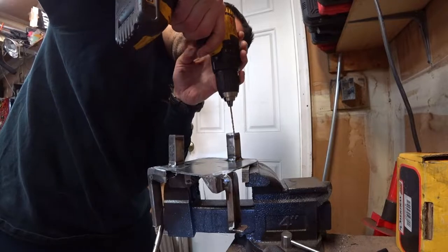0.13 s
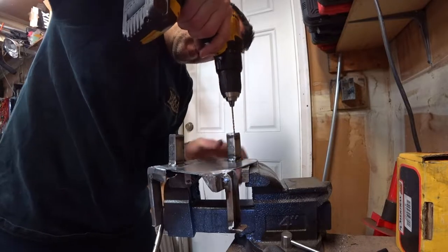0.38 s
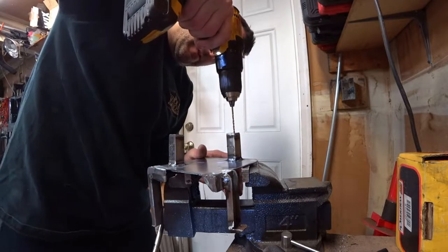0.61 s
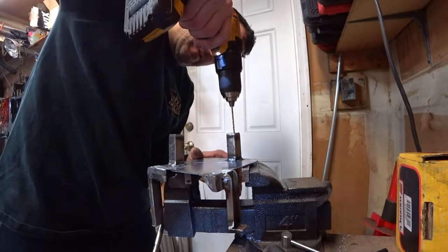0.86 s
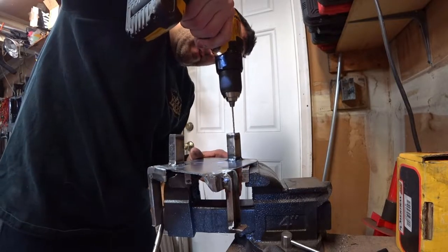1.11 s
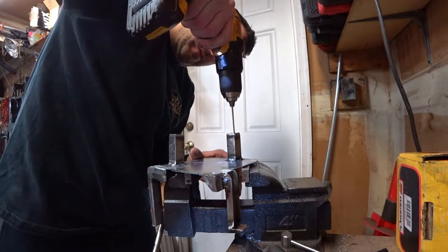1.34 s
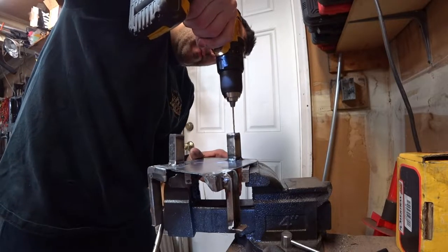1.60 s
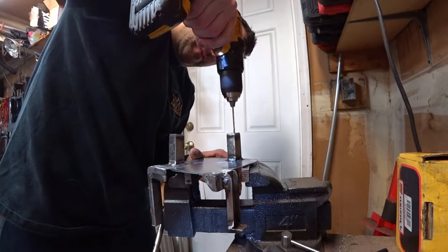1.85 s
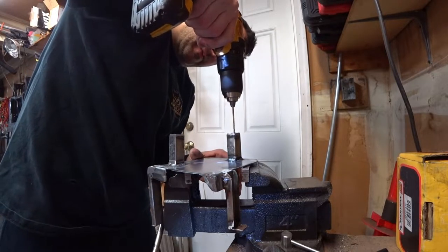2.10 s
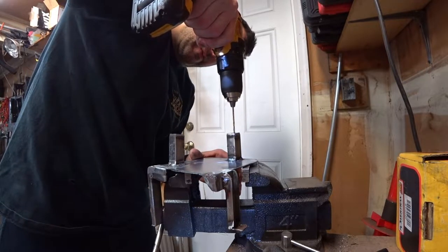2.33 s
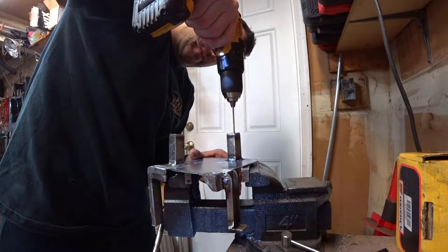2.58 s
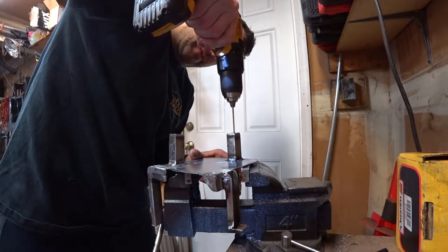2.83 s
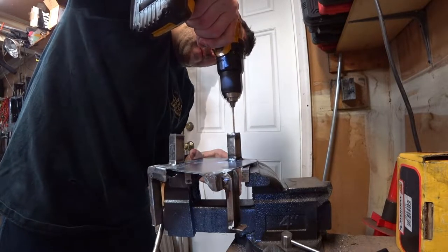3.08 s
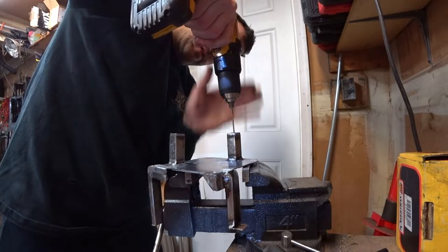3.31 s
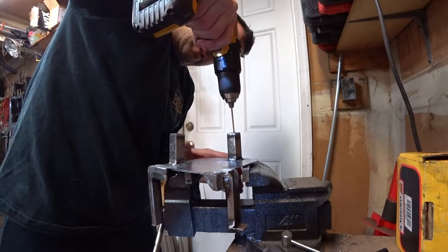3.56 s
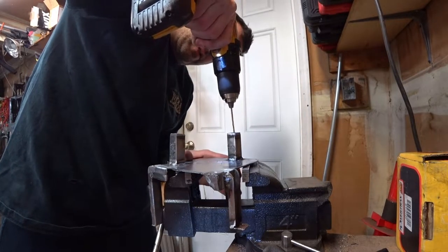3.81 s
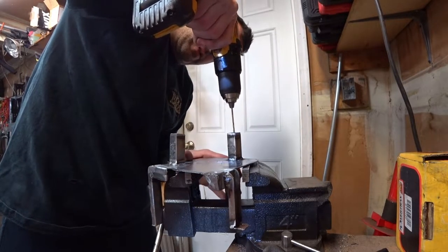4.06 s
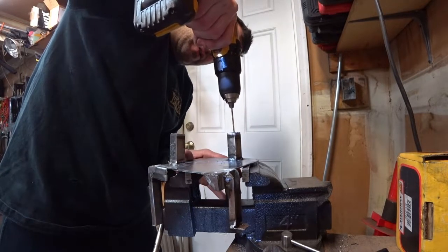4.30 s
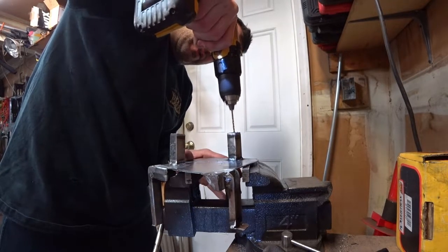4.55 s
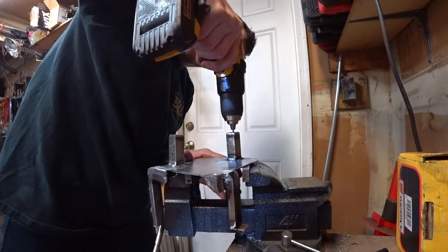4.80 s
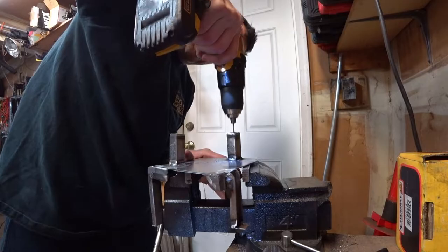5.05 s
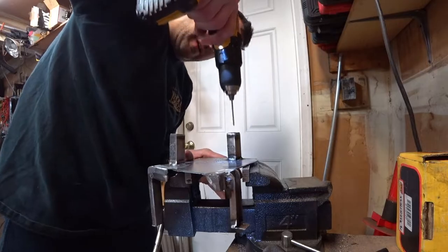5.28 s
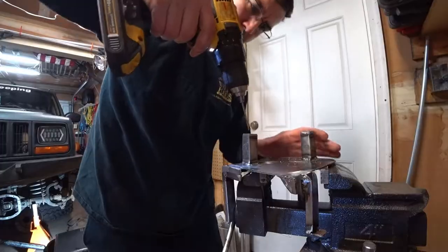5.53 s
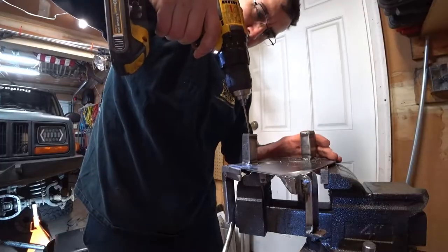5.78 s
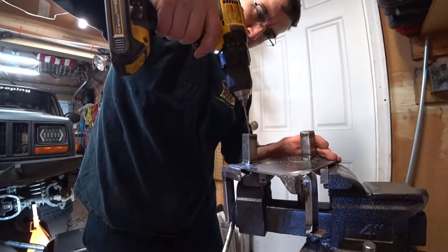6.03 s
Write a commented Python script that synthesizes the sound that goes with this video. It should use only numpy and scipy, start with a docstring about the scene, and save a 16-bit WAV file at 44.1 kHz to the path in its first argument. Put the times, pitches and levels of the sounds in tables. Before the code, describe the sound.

After faint finger clicks, a battery drill's gear whine climbs, holds high, sinks under load, catches roughly, and brakes into quiet room hum.

```python
"""A cordless drill bores aluminium in a garage vise, an arm's length from a small stereo microphone.
Room hum, coloured noise, lies under all; a finger click, a struck scrape ringing modes, comes before the motor.
Clatter (uneven impacts in the housing), a fixed trigger tone and speed-locked gear whines rise together;
the vise sings in patches as resonant noise, before, between and after snags of the bit as it breaks through.
The brake rattles the gears to rest, and a few small clicks end over the hum."""
import sys
import numpy as np
from scipy import signal
from scipy.fft import rfft, irfft
from scipy.io import wavfile
from scipy.ndimage import uniform_filter1d

SR = 44100
rng = np.random.default_rng(int(sys.argv[2]) if len(sys.argv) > 2 else 0)


def nominal_scale(level):
    """Amplitude ratio for a level in decibels (scalar or array-like)."""
    x = np.asarray(level, float) / 20
    return 10 ** x


def wav_record(signal):
    """Record a signal, one row per channel, as 16-bit PCM in the file named by sys.argv[1]."""
    frames = np.transpose(np.atleast_2d(signal))
    bounded = np.clip(frames, -1, 1)
    # unit amplitude maps onto the largest positive 16-bit level
    quanta = np.round(bounded * 32767).astype(np.int16)
    wavfile.write(sys.argv[1], SR, quanta)


N = 271215
TIME = np.arange(N) / SR
FREQ = np.fft.rfftfreq(N, 1 / SR)

# Spectrum of the garage's hum, before levelling: pitch_hz, level_db [per Hz]
ROOM_SPECTRUM = [(24, -76), (40, -45.5), (112, -33), (136, -3.5), (281, -10.5), (482, -3.5), (828, -9),
                 (1150, -3), (1230, -4), (1670, -6.5), (1930, -10), (3990, -18), (11000, -32), (14200, -64),
                 (22000, -120)]
# Tint of the sound coming back from the walls: pitch_hz, gain_db
WALL_TINT = [(60, 8.5), (140, -18.5), (300, -8.5), (800, 4), (2000, 4.5), (4500, -0.5), (9000, 2)]
# Fingers on chuck and trigger: start_s, peak_db, centre_hz, spread_octaves, scrape_ms
FINGER_CLICKS = [(.086, -43, 1200, 0.6, 7.5), (.653, -40.5, 3500, 0.9, 2.4), (.68, -41, 4500, 0.9, 4.4),
                 (5.796, -54, 5300, .4, 7.2), (5.802, -52, 600, .5, 8), (5.817, -47, 2400, 1.0, 7.9),
                 (5.826, -52, 750, .4, 9), (5.834, -53, 7200, .3, 10), (5.85, -52, 5400, .4, 9.3),
                 (6.002, -49, 4700, .4, 3), (6.007, -47, 8000, 1.0, 3)]
# The bit catches on the edge of the hole: start_s, peak_db, centre_hz, spread_octaves, scrape_ms
BIT_SNAGS = [(4.605, -22, 804, 1.2, 12.5), (4.644, -24, 520, 0.5, 10), (4.668, -24, 3470, 0.35, 7.9),
             (4.676, -22.5, 6800, 0.066, 6.9), (4.784, -24.5, 4600, 1.8, 10), (5.03, -21.5, 520, .8, 9.3)]
# The brake grabs and the gears rattle to rest: start_s, peak_db, centre_hz, spread_octaves, scrape_ms
BRAKE_RATTLES = [(5.322, -23, 3220, 0.73, 12.5), (5.345, -22, 3794, 0.97, 2.2),
                 (5.352, -22.5, 3665, 0.32, 9.2), (5.389, -37.5, 3900, 0.42, 16),
                 (5.406, -35, 3500, 0.74, 12), (5.439, -42.5, 5990, 1.6, 10),
                 (5.462, -47.5, 3000, 0.79, 15)]
# Modes of vise and drill body when struck: pitch_hz, level_db [at the blow's centre], t60_s
STRUCK_MODES = [(500, 2, .05), (750, 0, .05), (1360, 0, .055), (1650, -3, .035), (2750, -2, .02),
                (3600, -2, .014), (4600, -4, .03), (5400, -4, .012), (6800, -3, .025), (7300, -5, .016),
                (8500, -6, .01), (10000, -8, .01)]
# Motor speed over time: time_s, mesh_hz [main gear mesh]
MOTOR_SPEED = [(0.67, 545), (0.72, 782), (0.93, 1465), (1.1, 1898), (1.2, 2242), (1.34, 2533), (1.51, 2800),
               (1.64, 2883), (2.01, 3043), (2.1, 3150), (2.3, 3770), (2.5, 4127), (2.66, 4217),
               (2.82, 4290), (3.09, 4325), (3.18, 4338), (3.34, 4432), (3.4, 4337), (3.54, 3758),
               (3.64, 3375), (3.75, 2850), (3.85, 2740), (3.98, 2682), (4.26, 2698), (4.35, 2620),
               (4.45, 2290), (4.62, 1883), (4.73, 2847), (4.78, 2772), (4.86, 2570), (4.94, 2285),
               (5.06, 1950), (5.18, 2414), (5.28, 2178), (5.36, 1992)]
# Course of the boring: time_s, clatter_db, pressure_db [lifts the rumble], torque_db [on the teeth]
BORING = [(0.63, -73, 6, -4), (0.72, -49.5, 7, -1), (0.85, -42.5, 6, 1), (1.1, -36.5, -2, -3),
          (1.4, -35, 2, 4.5), (1.75, -34, 2, -1), (2.1, -33.5, 0.5, 0.5), (2.3, -31.5, 1, 1.5),
          (2.55, -31, 1.5, -3), (2.75, -31.5, 1, -10), (3.0, -31, 2.5, -6.5), (3.15, -30, 1.5, -5.5),
          (3.27, -29.5, 0.5, 4), (3.45, -30.5, 1.5, -1.5), (3.6, -31.5, 1, 2), (3.8, -32.5, 2.5, 6),
          (4.05, -33, 2, 5), (4.36, -32, -0.5, 4.5), (4.56, -34.5, 7.5, -1), (4.67, -34.5, 9, -3),
          (4.73, -34.5, 7.5, 8.5), (4.8, -34, 6, 4), (4.88, -35, -7, 3), (5.01, -35.5, -11, -5),
          (5.05, -36, 12.5, -10), (5.2, -36, 1, -6), (5.35, -38.5, -8, -3), (5.43, -71, 10, -3)]
# Spectrum of the impacts, before levelling: pitch_hz, level_db [per Hz]
IMPACT_SPECTRUM = [(590, -37), (1000, -13.5), (1310, -13.5), (1630, -11.5), (2320, -6.5), (2560, -7.5),
                   (3830, -0.5), (4230, -2.5), (4630, -2), (8120, -4.5), (11000, -15.5), (14200, -78),
                   (22000, -120)]
# Spectrum of the low rumble, before levelling: pitch_hz, level_db [per Hz]
RUMBLE_SPECTRUM = [(24, -70.5), (40, -37), (160, -23), (393, -13), (578, -12.5), (654, -2.5), (1010, -19.5),
                   (1310, -0.5), (1600, -9.5), (2080, -13.5), (3520, -120)]
# Housing and vise resonances, one pass: pitch_hz, width_hz, lift_db
HOUSING_MODES = [(175.3, 11, 7), (338.7, 16, 9.5), (428, 18.4, 6), (528, 70, 4.5), (600, 100, -12),
                 (804, 44, 7.5), (903, 36, 7.5), (1360, 110, 2.5), (2470, 32, 6.5), (3380, 200, 0.5),
                 (4680, 36, 7), (6300, 150, 2.5), (8280, 240, 4.5), (8500, 880, -1), (10460, 600, 9)]
# Slow gear stages, before the housing: mesh_multiple, level_db [against clatter]
SLOW_STAGES = [(0.0628, -46), (0.174, -42.5), (.21, -39), (.27, -37.5)]
# Trigger electronics: time_s, on_share [part of the time that the current is on, 0 to 1]
CURRENT_ON = [(0.645, 0.069), (0.75, 0.19), (1.1, .4), (1.5, 0.34), (2.3, 0.5), (2.45, 0.83), (2.6, 0.68),
              (2.8, 0.86), (3.05, 0.85), (3.2, .98), (3.4, 0.99), (3.55, 1), (3.6, 0.018), (3.7, 0.016),
              (3.8, .2), (4.1, 0.24), (4.4, 0.2), (4.62, 0.22), (4.76, 0.16), (4.82, .02), (5.05, 0.026),
              (5.09, 0.28), (5.17, 0.16), (5.22, .05), (5.36, 0.053)]
# Whine lines, before the case: mesh_multiple, level_db [against clatter at full speed],
# slope_db [per octave of speed], torque_share, glide_db [gained while the speed changes fast]
MESH_LINES = [(1.0, -16.5, 1.5, 0, 2.5), (2.0, -22, 3, 0, 2.5), (.481, -19, 5, 1.4, 0.5),
              (.436, -28, -1, -.4, 1.5), (1.058, -19.5, 9, -.8, -3), (2.118, -21, 7, -.6, -3),
              (1.924, -23, 5, -.7, -1.5), (.872, -27, 6, -.4, -1.5), (1.744, -28, 3, -.2, -1.5),
              (3.0, -20, 6, .6, -4), (2.924, -26, 1, 1.2, -3)]
# How the gear case radiates a whine: pitch_hz, gain_db
CASE_RADIATION = [(400, -14), (750, -6), (1000, 0.5), (1150, 1.5), (1330, 1.5), (1600, -1), (1900, -6),
                  (2100, -0.5), (2400, -2.5), (2780, 2), (3100, 3.5), (3700, 7.5), (4250, 2), (4550, 2),
                  (5200, 7.5), (6050, 11), (6700, 2.5), (8400, 5.5), (9100, 1.5), (11000, 7)]
# The vise sings as the bit rubs the hole's wall: centre_s, length_s, level_db [against clatter]
VISE_SONGS = [(1.29, .08, -21), (1.47, .1, -19), (2.27, .12, -24), (2.75, .4, -27), (3.3, .25, -28),
              (3.55, .1, -21), (3.72, .07, -25), (4.03, .08, -23), (4.79, .05, -21), (5.07, .05, -16),
              (5.15, .09, -15), (5.26, .1, -16)]


def unit(x):
    """Scale to an rms of one."""
    return x / np.sqrt(np.mean(x ** 2))


def curve(table, column):
    """Follow one column of a table over time in straight lines."""
    rows = np.array(table, float)
    return np.interp(TIME, rows[:, 0], rows[:, column])


def shape(x, points, peaks=()):
    """Colour a sound by (Hz, dB) points, with resonances (Hz, width Hz, lift dB) on top."""
    hz, db = np.transpose(points)
    gain = nominal_scale(np.interp(np.log(FREQ + 1), np.log(hz), db))
    for peak_hz, width_hz, lift_db in peaks:
        resonance = 1 / (1 + (2 * (FREQ - peak_hz) / width_hz) ** 2)
        gain = gain * (1 + (nominal_scale(lift_db) - 1) * resonance)
    return irfft(rfft(x) * gain, N)


def walk(rate):
    """Random levels held 1 / rate s and slewed twice; spread near 1."""
    hold = int(SR / rate)
    steps = np.repeat(rng.standard_normal(N // hold + 1), hold)
    return 0.964 * uniform_filter1d(uniform_filter1d(steps, hold), hold)[:N]


def running(table, edge_s):
    """One while the table lasts, with short ramps inside both ends."""
    return np.clip(np.minimum(TIME - table[0][0], table[-1][0] - TIME) / edge_s, 0, 1)


def decay(t, t60_s):
    """Exponential decay that falls 60 dB in t60_s."""
    return np.exp(-np.log(1000) * t / t60_s)


def ringing(hz, width_hz):
    """A sharp resonance kept sounding: noise through one narrow peak."""
    spectrum = rfft(rng.standard_normal(N))
    return unit(irfft(spectrum / (1 + (2 * (FREQ - hz) / width_hz) ** 2), N))


def hum():
    """Broad room noise, slowly wandering in level and mostly alike on both sides."""
    level_db, side_db = -63.5, -10  # side against mid, before the wall tint
    mid = unit(shape(rng.standard_normal(N), ROOM_SPECTRUM))
    side = unit(shape(rng.standard_normal(N), ROOM_SPECTRUM))
    side = nominal_scale(side_db) * shape(side, WALL_TINT)
    return nominal_scale(level_db + 2.7 * walk(3.5)) * (mid + side * np.array([[1], [-1]]))


def knocks(blows, crack_db):
    """Each blow is a short scrape that rings the modes near its centre, with a dry crack on top."""
    crack_db_per_doubling = 4  # a blow that spreads over more modes cracks more
    out, t = np.zeros(N + 8192), np.arange(4096) / SR
    crack_filter = signal.butter(1, 4500, fs=SR)
    scrapes = rng.standard_normal((len(blows), 2, 4096))
    for (start_s, peak_db, centre_hz, spread, scrape_ms), noise in zip(blows, scrapes):
        scrape_ms, spread = max(scrape_ms, .5), max(spread, .05)
        rise = np.minimum(1000 * t / (0.12 * scrape_ms), 1)
        scrape, crack = noise * rise * np.exp(-(1000 * t / scrape_ms) ** 2)
        modes = 0
        for hz, level_db, t60_s in STRUCK_MODES:
            # modes far from the centre are struck less
            struck_db = level_db - 5.1 * (np.log2(hz / centre_hz) / spread) ** 2
            modes = modes + nominal_scale(struck_db) * np.sin(2 * np.pi * hz * t) * decay(t, t60_s)
        ring = signal.fftconvolve(scrape, modes)[:4096]
        crack = signal.lfilter(*crack_filter, crack)
        crack_gain = nominal_scale(crack_db + crack_db_per_doubling * np.log2(spread))
        # each blow is thinned below a corner that follows its centre pitch
        thinning = signal.butter(2, max(0.31 * centre_hz, 420), "high", fs=SR, output="sos")
        blow = signal.sosfilt(thinning, unit(ring) + crack_gain * unit(crack))
        start = int(start_s * SR)
        out[start:start + len(blow)] += nominal_scale(peak_db) * blow / np.abs(blow).max()
    return out[:N]


def motor_turns(mesh_hz):
    """Add up the main mesh's cycles, its speed slightly unsteady."""
    return np.cumsum(mesh_hz * (1 + 0.00148 * walk(40))) / SR


def impacts(turns):
    """Dense uneven tooth and chip impacts pulse with the shaft and ring the housing."""
    hits = rng.standard_normal(N) * nominal_scale(rng.exponential(size=N))
    shaft = 1 + 0.06 * np.sin(2 * np.pi * 0.051 * turns)
    flicker = nominal_scale(.7 * walk(30))
    spectrum = rfft(shape(hits * shaft * flicker, IMPACT_SPECTRUM, HOUSING_MODES))
    # parts of the housing rattle in their own half-octave bands, each with its own unevenness
    half_octaves = np.log2((FREQ + 1) / 500) * 2
    out = 0
    for k in range(11):
        band = irfft(spectrum * np.clip(1 - abs(half_octaves - k), 0, 1), N)
        out = out + nominal_scale(0.54 * walk(16) + 0.93 * walk(35)) * band
    return unit(out)


def rumble():
    """Low uneven noise through the housing, lifted by the pressure of the bit on the work."""
    noise = rng.standard_normal(N) * nominal_scale(1.3 * walk(10))
    against_clatter_db = -21 + curve(BORING, 2)
    return nominal_scale(against_clatter_db) * unit(shape(noise, RUMBLE_SPECTRUM, HOUSING_MODES))


def slow_gears(turns):
    """Slow stages hum as sines locked to the motor, mostly heard as they pass a housing resonance."""
    gears = 0
    for multiple, level_db in SLOW_STAGES:
        tone = np.sin(2 * np.pi * multiple * turns + walk(30))
        gears = gears + nominal_scale(level_db + 4.6 * walk(12)) * tone
    # an almost flat colour; the resonances count twice
    return shape(gears, [(100, 0.0062), (2000, 0)], HOUSING_MODES + HOUSING_MODES)


def housing_ring():
    """The housing rings in patches, a narrow resonance swelling and fading."""
    level_db, patchy_db, patches_per_s = -24.5, 7, 6.3  # against clatter
    return nominal_scale(level_db + patchy_db * walk(patches_per_s)) * ringing(5700, 110)


def vise_song():
    """The vise sings at one resonance while the bit rubs the wall of the hole."""
    rubbing = sum(nominal_scale(level_db) * np.exp(-(2 * (TIME - centre_s) / length_s) ** 4)
                  for centre_s, length_s, level_db in VISE_SONGS)
    return rubbing * ringing(645, 30)


def clatter(turns):
    """Impacts, rumble, slow gears and the narrow resonances share the level of the boring."""
    out = nominal_scale(-3.0) * impacts(turns) + rumble() + slow_gears(turns)
    out = out + housing_ring() + vise_song()
    return nominal_scale(curve(BORING, 1)) * out * running(BORING, 0.021)


def switching():
    """Chopped battery current makes the windings sing a fixed pitch and octave, as a pulse wave does."""
    pitch_hz, level_db, octave_db = 3933.3, -42, -52.5  # levels at the best share of on-time
    phase = 2 * np.pi * pitch_hz * TIME + 0.35 * walk(30)
    on = np.clip(curve(CURRENT_ON, 1), 0, 1)
    tone = nominal_scale(level_db) * np.sin(np.pi * on) * np.sin(phase)
    octave = nominal_scale(octave_db + 2.0 * walk(25)) * np.sin(2 * np.pi * on) * np.sin(2 * phase)
    # sqrt(2) turns rms levels into sine peaks
    return np.sqrt(2) * nominal_scale(1.46 * walk(24.26)) * (tone + octave) * running(CURRENT_ON, 0.002)


def snag_jolts():
    """Deep snags jolt the teeth apart and the whines dip: the dip in dB over time."""
    deep_below_hz, jolt_db, jolt_s = 1000, -14, .065
    return sum(jolt_db * np.exp(-((TIME - start_s - jolt_s / 2) / jolt_s * 2) ** 4)
               for start_s, _, centre_hz, *_ in BIT_SNAGS if centre_hz < deep_below_hz)


def whine(mesh_hz, turns):
    """Tooth meshes locked to the motor; tooth errors make each line flutter in level and phase."""
    full_speed_hz, wander_db, wanders_per_s = 4300, 1.2, 5
    # backlash loosens the meshes while the speed changes
    change = uniform_filter1d(np.abs(np.gradient(np.log(mesh_hz))) * SR, size=2000)
    loose = 1 + np.minimum(change, 1) / 2
    octaves = np.log2(mesh_hz / full_speed_hz)
    torque_db = curve(BORING, 3)
    out = 0
    for multiple, level_db, slope_db, torque_share, glide_db in MESH_LINES:
        below_top = multiple * mesh_hz < 11000
        # planet wheels passing the ring gear make every line throb
        throb = 1 + .25 * np.sin(2 * np.pi * (.0125 * turns + rng.random()))
        # higher lines feel the tooth errors more
        swell = throb * nominal_scale(loose * (.5 + 1.1 * multiple) * walk(40))
        phase_error = loose * (.05 + .5 * multiple) * walk(70)
        line = swell * np.sin(2 * np.pi * multiple * turns + phase_error)
        line_db = level_db + slope_db * octaves + torque_share * torque_db
        # each line also swells and fades slowly on its own
        line_db = line_db + 2 * glide_db * (loose - 1) + wander_db * walk(wanders_per_s)
        out = out + below_top * nominal_scale(line_db) * line
    out = out * nominal_scale(curve(BORING, 1) + snag_jolts()) * running(MOTOR_SPEED, 0.0098)
    return np.sqrt(2) * shape(out, CASE_RADIATION)


def garage(x):
    """Close walls and shelves return a short diffuse tail, different at each ear."""
    echo_db, t60_s = -8.5, 0.22
    t = np.arange(int(.4 * SR)) / SR
    tails = rng.standard_normal((2, len(t))) * decay(t, t60_s) * (t > .002)
    tails = tails / np.sqrt(np.sum(tails ** 2, axis=1, keepdims=True))
    return nominal_scale(echo_db) * signal.fftconvolve(shape(x, WALL_TINT)[None], tails, axes=1)[:, :N]


def scene():
    """The drill is a little right of the microphone; its switching tone enters the echo at half strength."""
    room = hum()
    # second setting: dry crack against ring, dB
    blows = knocks(FINGER_CLICKS, 0) + knocks(BIT_SNAGS, 2) + knocks(BRAKE_RATTLES, 5)
    mesh_hz = curve(MOTOR_SPEED, 1)
    turns = motor_turns(mesh_hz)
    drill = blows + clatter(turns) + whine(mesh_hz, turns)
    chopped = switching()
    left_over_right_db = -1.94
    pan = nominal_scale(np.array([[left_over_right_db], [-left_over_right_db]]) / 2)
    return pan * (drill + chopped + garage(drill + chopped / 2)) + room


def band_limit(x):
    """A steep low-pass at the top of the band."""
    return signal.sosfilt(signal.butter(12, 11110, fs=SR, output="sos"), x)


def record(dry):
    """The small microphones lose the deep bass."""
    no_deep_bass = signal.butter(2, 50, "high", fs=SR, output="sos")
    mix = signal.sosfilt(no_deep_bass, dry)
    return band_limit(mix)


dry = scene()
out = record(dry)
wav_record(out)
```